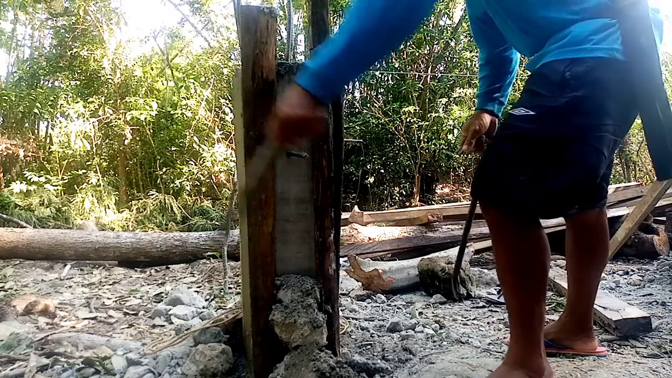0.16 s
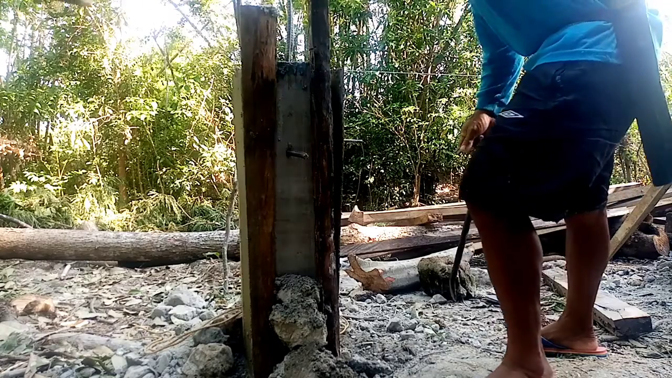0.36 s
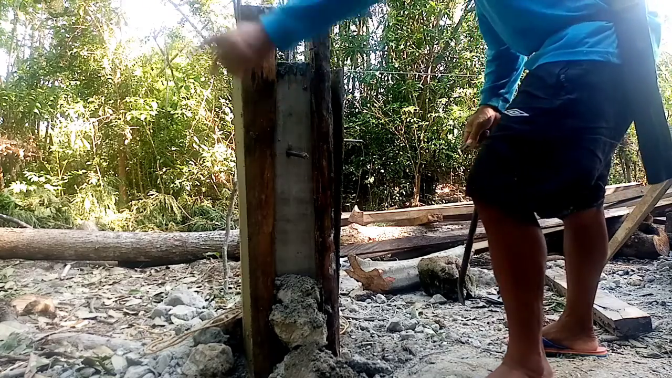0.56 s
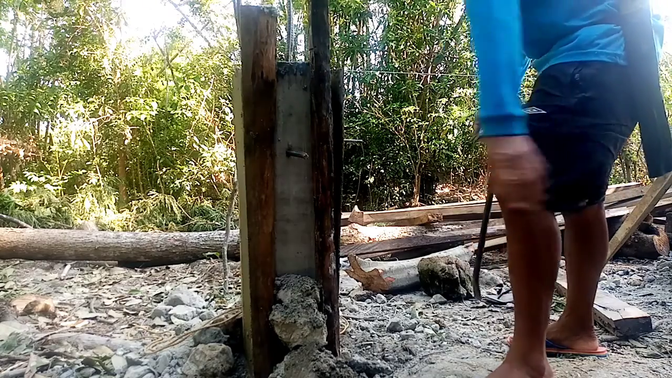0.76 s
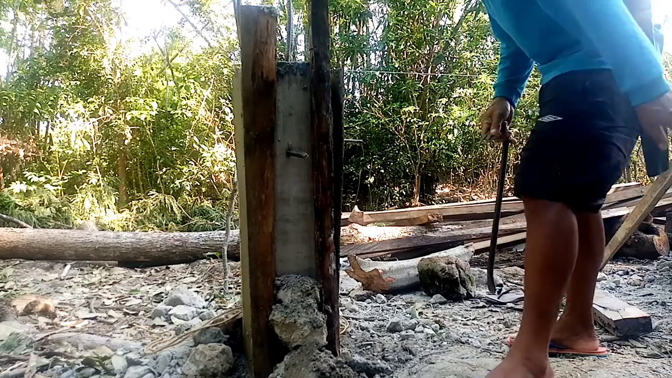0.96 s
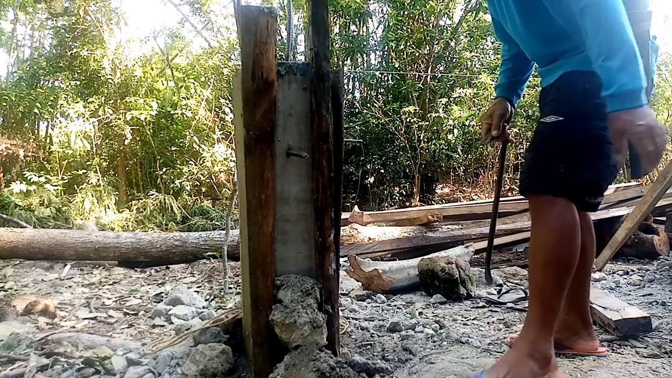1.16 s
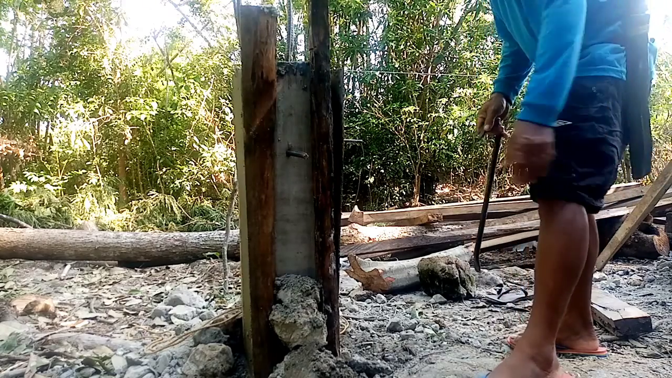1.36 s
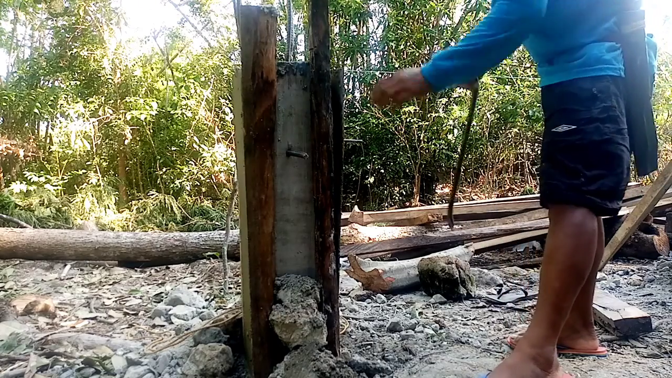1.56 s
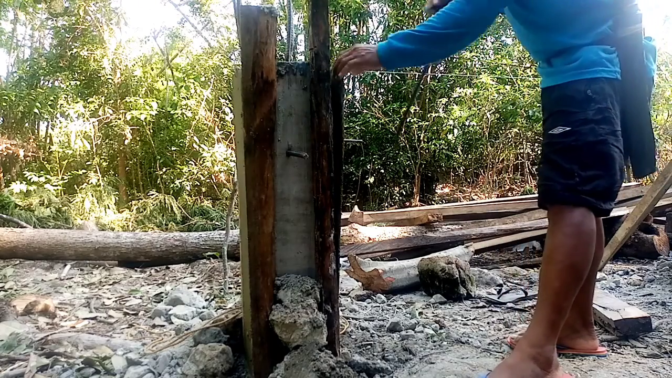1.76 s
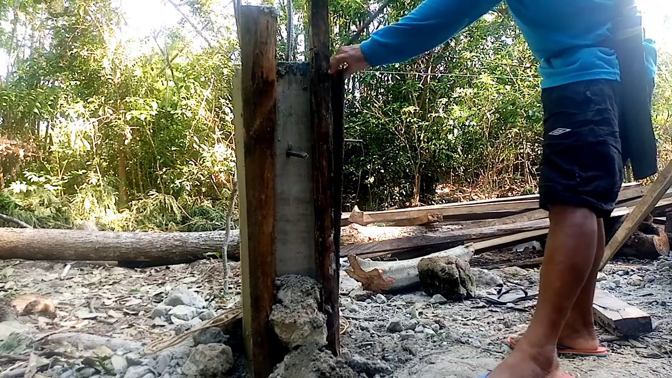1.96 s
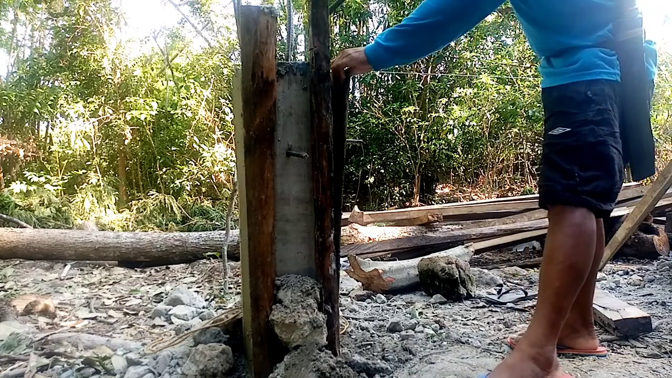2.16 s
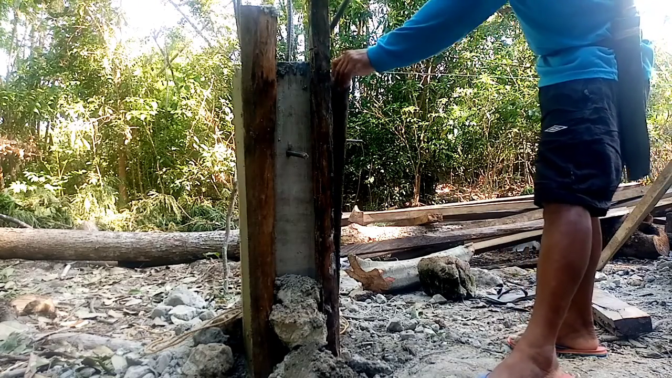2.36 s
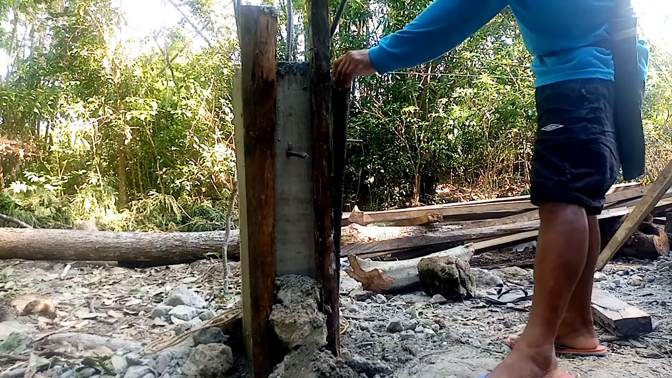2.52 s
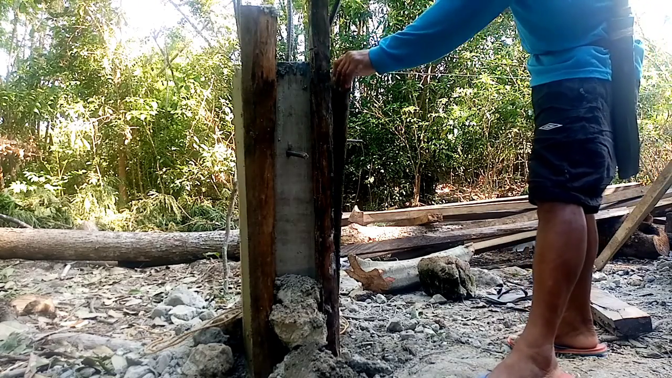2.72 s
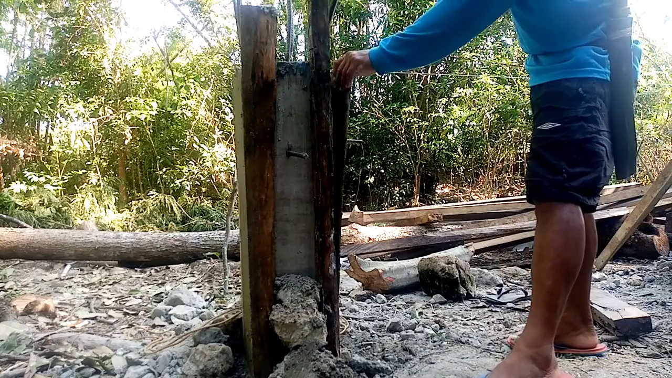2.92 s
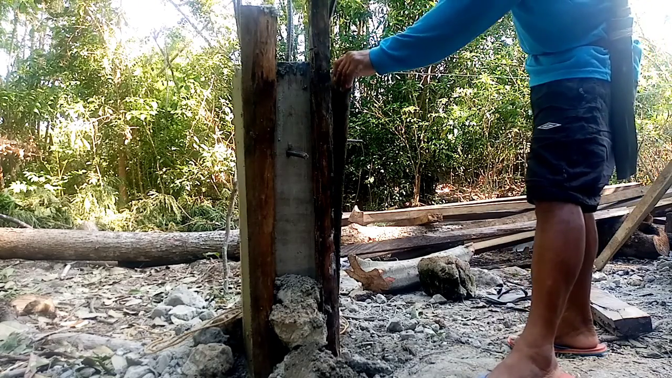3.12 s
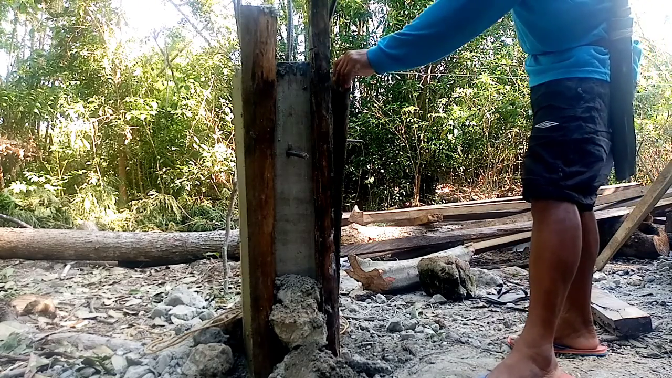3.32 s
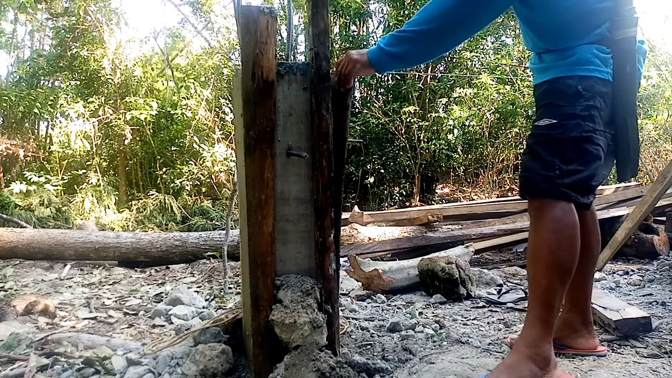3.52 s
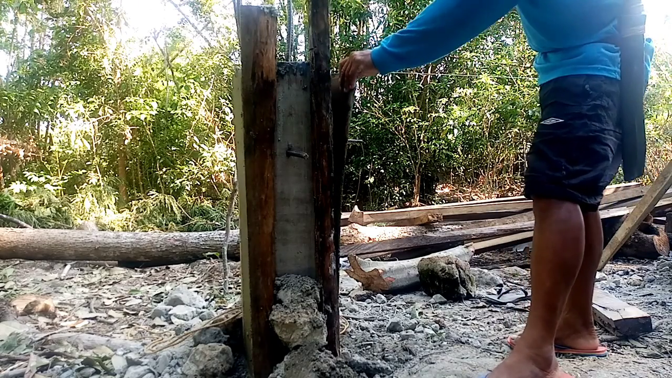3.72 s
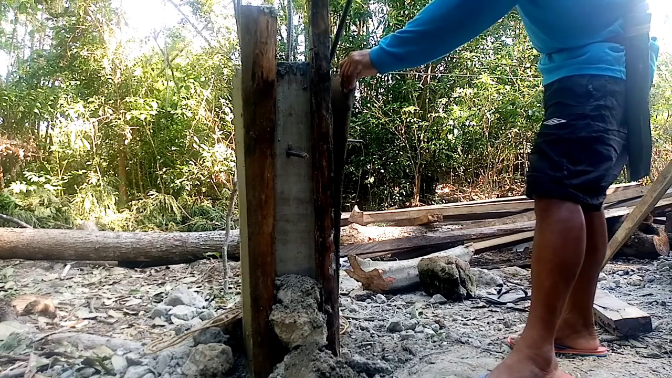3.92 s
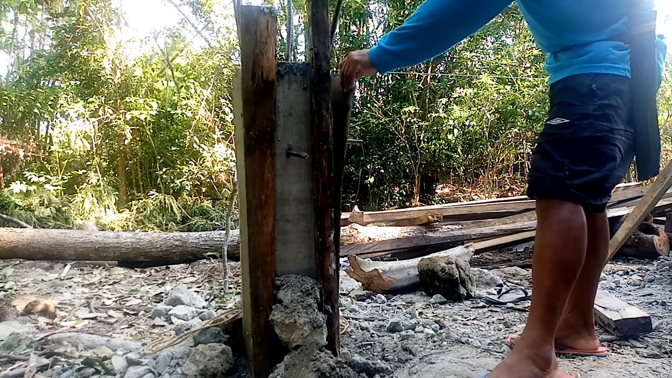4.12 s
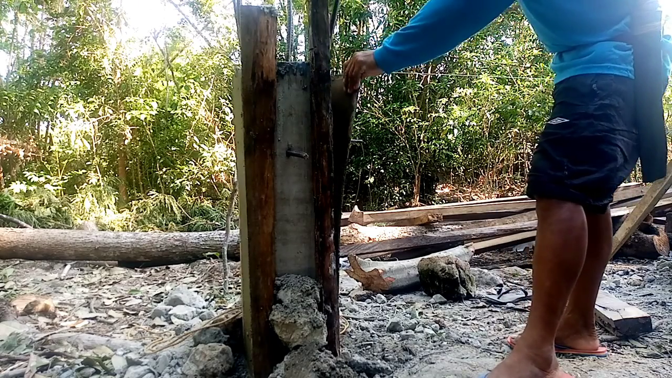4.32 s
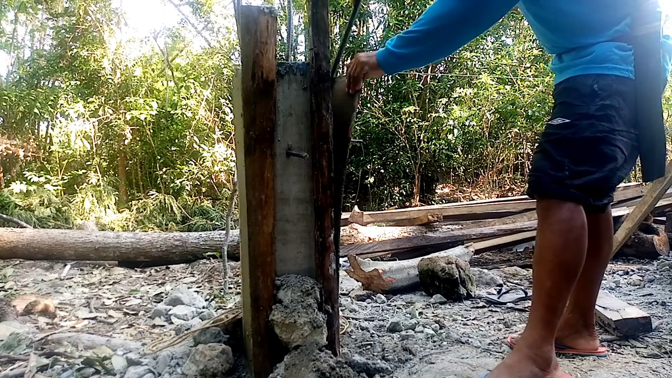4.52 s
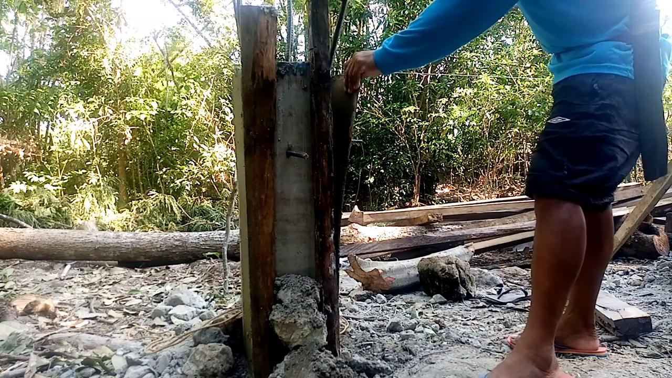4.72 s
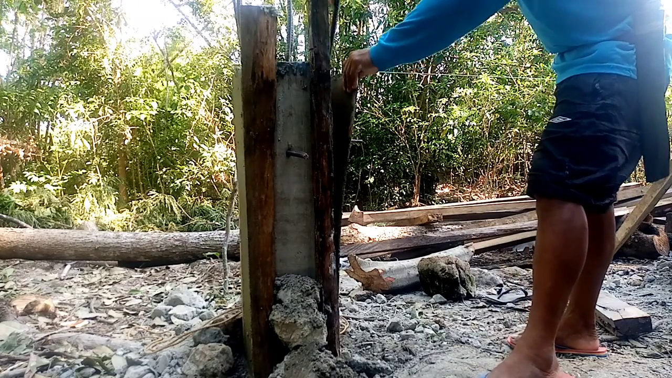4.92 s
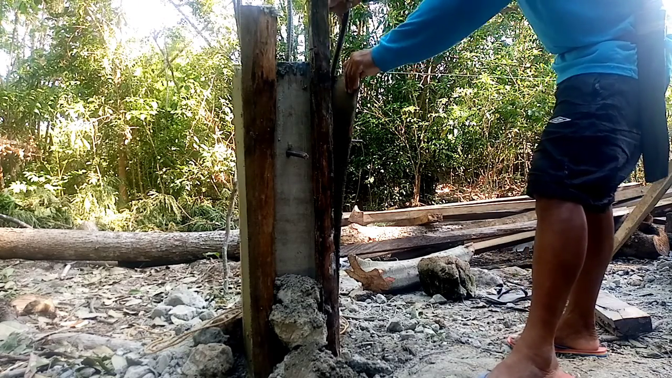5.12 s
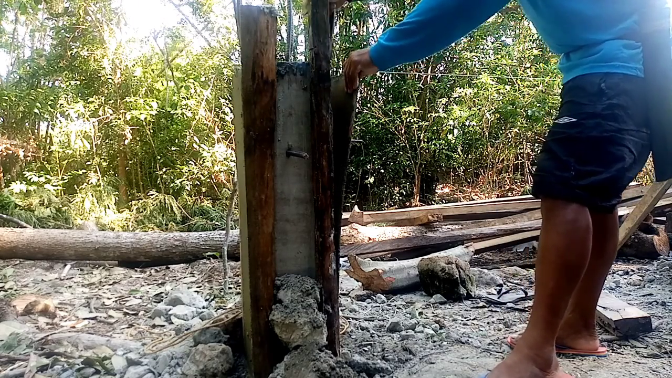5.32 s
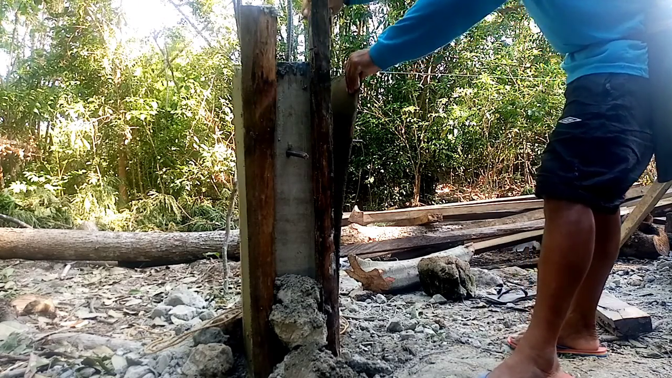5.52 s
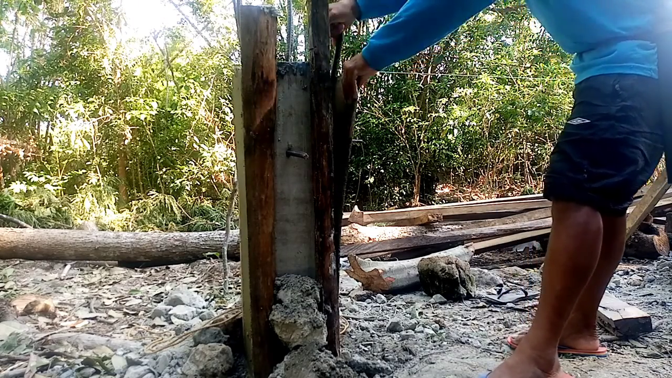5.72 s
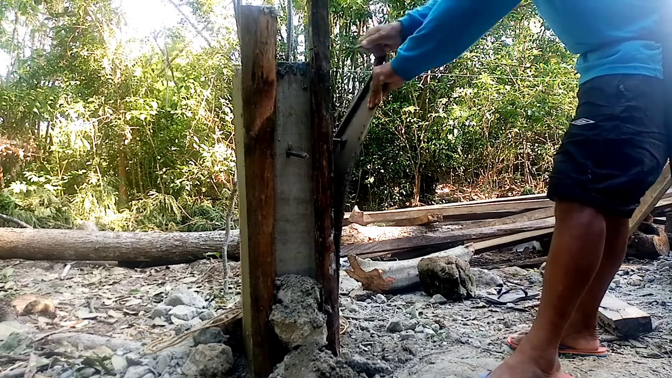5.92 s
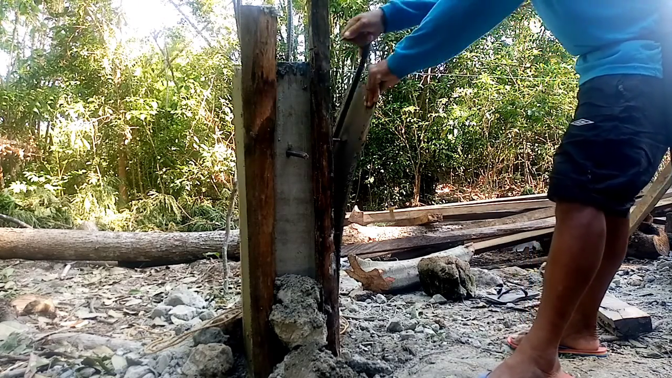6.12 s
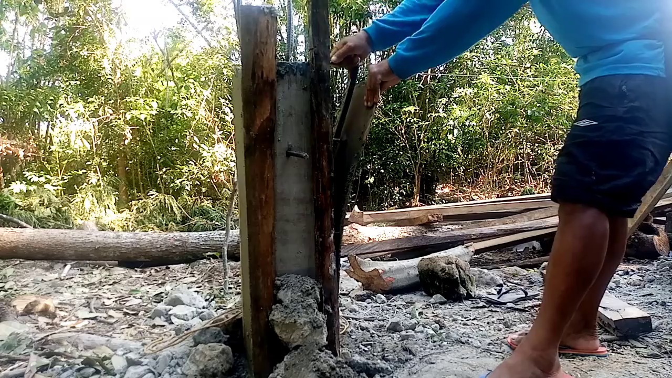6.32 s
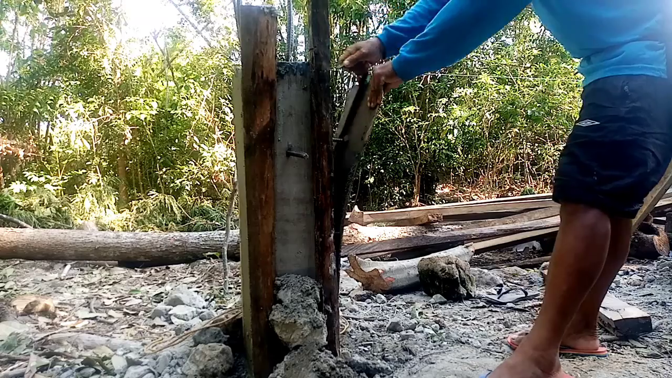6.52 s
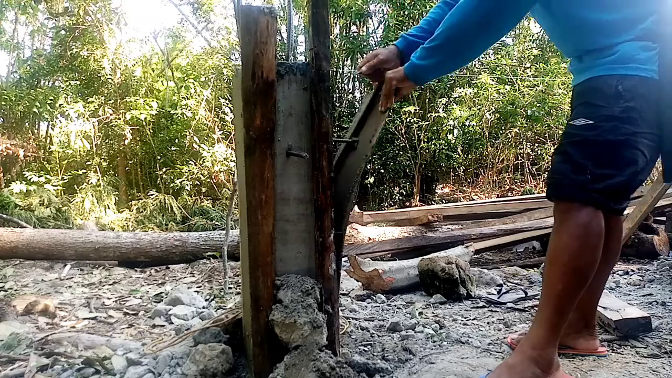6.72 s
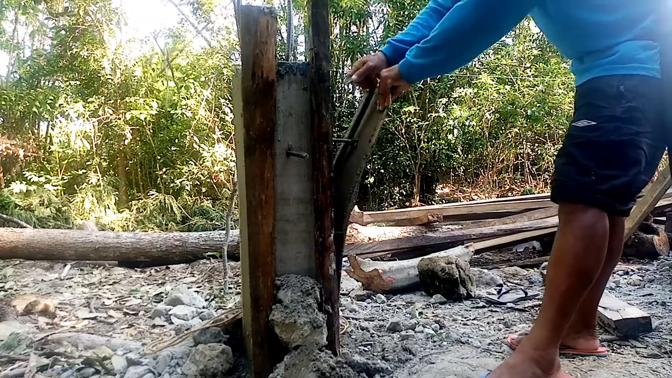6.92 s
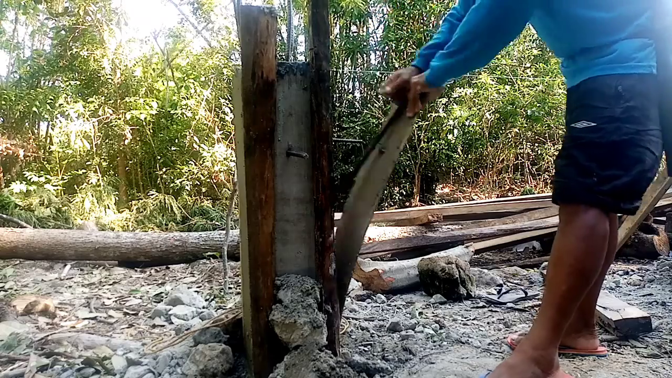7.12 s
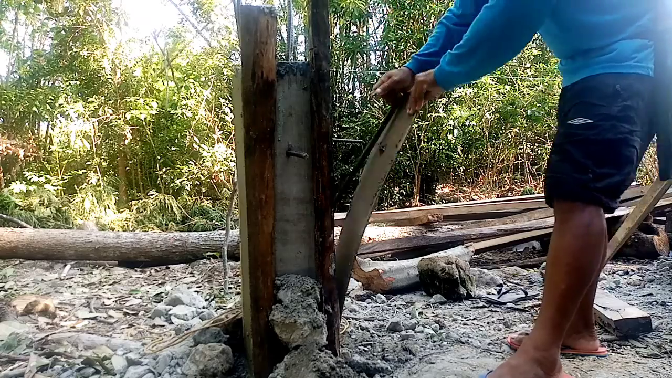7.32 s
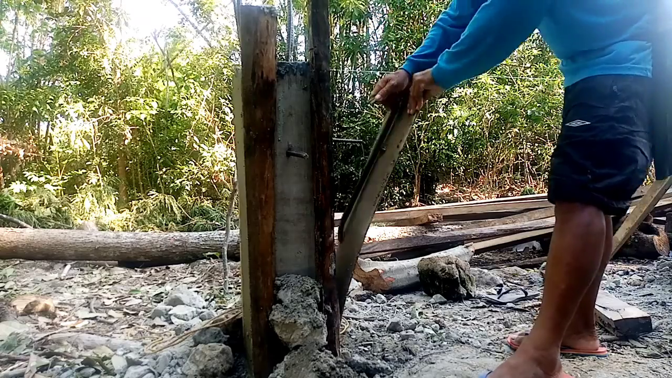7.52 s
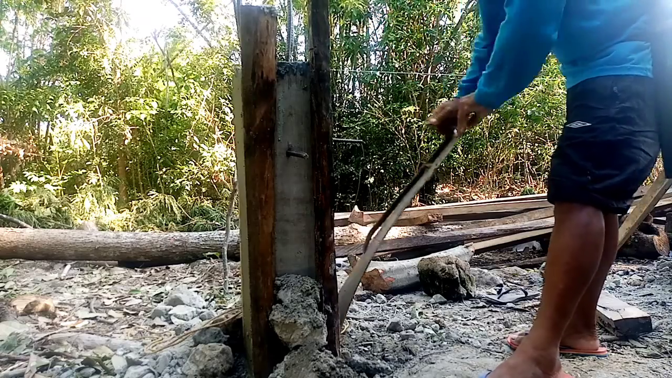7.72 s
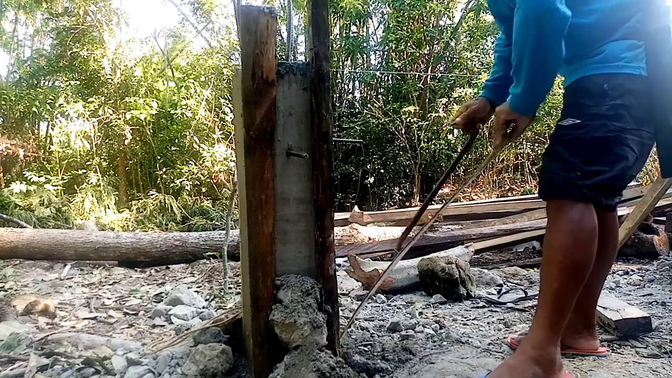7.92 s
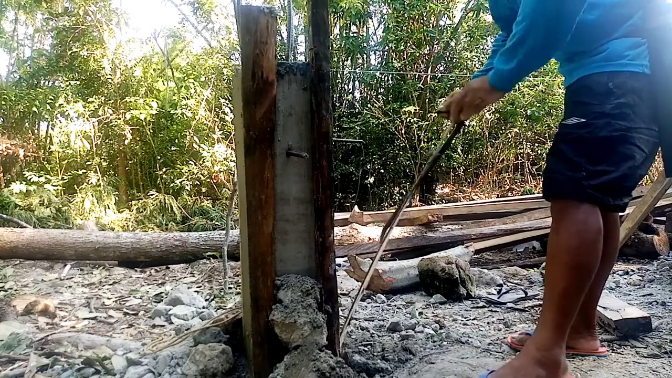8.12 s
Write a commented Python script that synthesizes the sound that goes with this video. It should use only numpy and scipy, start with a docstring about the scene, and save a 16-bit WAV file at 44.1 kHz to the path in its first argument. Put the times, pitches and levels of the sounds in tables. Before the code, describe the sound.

Throughout, a dense shrill insect chorus at about 6 to 9 kHz wavers lightly, louder on the right, over a very faint rumble of open air. Faint bird whistles come near 0.1 and 1.5 seconds, then short falling ones from 3.9 to 5.7. At 0.8 a stick lands flat on gravel with a sharp woody clatter and shifting stones, hopping weakly at 1.1. Quiet follows, with faint bumps and ticks from 1.9 to 3. At 3.5 a crack and hollow knocks begin the prying; another knock comes at 4.15, and the loudest, hardest crack at 4.67 with knocks just after. Soft scrapes fill 4.9 to 5.6. From 5.7 mortar chips spit and wooden knocks multiply, with a sharp snap at 6.5, a dense clatter from 6.9 to 7.2, and strong lower-pitched knocks at 7.45 and 7.7, ending in light scraping. Close, stereo, with slight tree reverberation.

```python
"""A building site beside a bamboo thicket, where insects shrill over faint air and a far bird whistles.
A tossed stick lands on gravel and bounces: wood modes and noise bursts, with grains for shifting stones.
Then a crowbar works a formwork board off a concrete post: the board scrapes, cracks and knocks, chips of
mortar break off, and its note sinks overall as it comes free. Contacts reach the two microphone ports a
moment apart; the trees answer diffusely."""
import sys
import numpy as np
from scipy import signal
from scipy.fft import rfft, irfft
from scipy.io import wavfile
from scipy.ndimage import map_coordinates

SR = 44100
rng = np.random.default_rng(int(sys.argv[2]) if len(sys.argv) > 2 else 0)


def transcribe(signal):
    """Save signal, clipped to [-1, 1], as a 16-bit WAV file at the path in sys.argv[1]."""
    frames = np.atleast_2d(signal).T
    limited = np.clip(frames, -1, 1)
    pcm = np.round(limited * 32767).astype(np.int16)
    wavfile.write(sys.argv[1], SR, pcm)


N = 360297  # length in samples

# Open air, its rumble: pitch_hz, density_db (dB per Hz, relative)
AIR_SPECTRUM = [(20, 5), (50, -5.5), (110, -0.5), (150, 0), (230, -14), (400, -20), (1200, -21.5),
                (4500, -24.5), (9000, -23)]
# Insect chorus as each port hears it: pitch_hz, density_db (dB per Hz, relative)
CHORUS_LEFT = [(4700, -60.5), (5300, -30.5), (5700, -13), (6130, -4.5), (6500, 0), (7250, -3.5), (7700, -8),
               (8300, -4), (9300, -9.5), (10200, -15.5), (11000, -15), (12500, -54)]
CHORUS_RIGHT = [(4700, -55.5), (5300, -28), (5700, -23), (6130, -4), (6700, -6.5), (7250, -2.5), (7700, -2),
                (8250, -2), (8800, -10.5), (10000, -19.5), (12000, -33), (15500, -38)]
# Nearer insects: pitch_hz, level_db (before wavering and placing)
NEAR_SINGERS = [(6150, -62), (6655, -59), (6875, -69), (7040, -61.5), (7225, -54.5), (7450, -58),
                (7890, -67.5), (8215, -61.5)]
# Whistles of a far bird: start_s, end_s, first_hz, last_hz (before wavering), level_db (before flutter)
WHISTLES = [(.14, 0.267, 2030, 1670, -82), (1.503, 1.627, 2770, 2700, -82), (3.91, 4.03, 1727, 1723, -76),
            (4.19, 4.33, 1910, 1830, -80), (4.42, 4.75, 1823, 1715, -75.5), (5.0, 5.29, 1860, 1816, -71.5),
            (5.24, 5.687, 1770, 1656, -73)]
# Answer of the thicket: pitch_hz, t60_s
TREE_DECAY = [(100, 0.36), (800, 0.4), (3000, 0.57), (8000, 0.81), (15000, 0.59)]

# Stick meeting the ground, flat at first, then in a hop: start_s, strength_db
STICK_HITS = [(0.816, -43.5), (0.821, -43), (.829, -40.5), (.843, -43), (0.8488, -42), (.86, -43),
              (1.076, -48), (1.086, -48), (1.164, -51), (1.234, -60)]
# Stones shifting under the stick: start_s, end_s, strength_db
GRAVEL_SLIDES = [(0.807, 0.871, -38.5), (.84, 0.935, -47.5), (.9, 1.031, -63.5), (1.058, 1.22, -56),
                 (1.183, 1.324, -71)]
# Low modes of the stick lying on the ground: pitch_hz, level_db, t60_s (before small random changes)
GROUND_MODES = [(166, -2.5, .04), (230, -0.5, .045), (350, -2, 0.11), (478, -4.5, 0.027)]

# Board knocking against the post: start_s, strength_db, hardness_db (below 0 a dull bump, above 15 a crack)
KNOCKS = [(2.006, -72, -28), (2.427, -59.5, -9), (2.926, -57, -18), (2.985, -56, 13), (3.455, -59, 16),
          (3.5113, -47.5, 35), (3.5438, -38.5, -2), (3.579, -35.5, 2), (4.023, -55.5, 20),
          (4.162, -40, -1.5), (4.327, -57.5, -32), (4.6676, -27, 22), (4.704, -39.5, -3),
          (4.786, -37.5, -9), (4.7951, -32.5, 5), (5.719, -53, 12.5), (5.841, -44.5, -13), (5.87, -43, -3),
          (6.019, -37, -5.5), (6.082, -43, -9), (6.357, -51.5, -14.5), (6.564, -41.5, -1),
          (6.618, -39.5, 26.5), (6.818, -47, -7), (6.901, -42, 10), (6.909, -35, -2), (6.926, -39, -7),
          (7.0054, -30.5, -0.5), (7.026, -38.5, 11.5), (7.069, -39, 2), (7.115, -33, 12.5),
          (7.215, -37.5, 8), (7.447, -34.5, 3), (7.562, -41, 0), (7.708, -28.5, 1), (7.7115, -40, 12.5),
          (7.738, -42, 0), (7.834, -41.5, 2)]
# Board dragging over concrete: start_s, end_s, strength_db, hardness_db
SCRAPES = [(3.5, 3.625, -54, -4.5), (3.735, 3.887, -50, -2.5), (4.301, 4.471, -53, -4.5),
           (4.898, 5.047, -55, -1), (5.186, 5.353, -62, 5), (5.452, 5.628, -60.5, 0),
           (5.719, 5.911, -46, 2), (5.882, 5.996, -56.5, 5), (6.077, 6.283, -59.5, -5.5),
           (6.437, 6.617, -50, 5), (6.615, 6.835, -52.5, 12.5), (6.886, 7.07, -52.5, -0.5),
           (7.489, 7.677, -58, 3.5), (7.637, 7.815, -47, -2), (7.748, 7.959, -59.5, -3)]
# Chips of mortar breaking off: start_s, strength_db
CHIPS = [(1.931, -52), (3.455, -53), (3.5112, -39.5), (4.137, -41.5), (4.693, -52.5), (5.287, -45.5),
         (5.759, -40), (5.798, -39), (5.818, -40.5), (5.96, -50), (6.022, -45.5), (6.489, -46),
         (6.4974, -33), (6.532, -38.5), (6.6665, -38), (6.763, -45), (6.901, -36.5), (6.926, -37),
         (6.996, -37.5), (7.114, -32), (7.714, -34)]
# As the board comes free its note sinks overall and it shakes the form less: start_s, note_hz, thud_db
STRAIN = [(3.55, 724, 2), (3.75, 873, -2), (5.3, 849, -0.5), (6.051, 740, 2), (6.5, 585, -3.5),
          (7.4, 658, -2.5), (7.7, 577, -13.5)]
# Low modes of the whole form: pitch_hz, level_db, t60_s (before small random changes)
FORM_MODES = [(105, -6, 0.11), (143, -3.5, 0.11), (210.6, 1, 0.091), (245, -0.5, 0.08), (342, -8, 0.13)]
# Modes of the board or stick: pitch (multiple of the note), level_db, t60_s (before small random changes)
BOARD_MODES = [(.52, -16.5, 0.059), (.7, -10.5, 0.075), (.88, 1.5, 0.022), (1.04, 4, 0.026),
               (1.36, -7.5, 0.041), (1.7, -16.5, 0.024)]
# High timber modes, in every crack and rub: pitch_hz, level_db, t60_s (before small random changes)
TIMBER_MODES = [(1133, 3.5, .04), (1280, -2.5, 0.025), (1987, -6, 0.019), (2120, -0.5, 0.034),
                (2300, -10, 0.029), (2810, -0.5, 0.083), (3126, 1, 0.085), (3800, -5.5, 0.24),
                (5070, -1.5, 0.11), (5050, -2.5, .02)]

# Colours of the four parts of a contact: pitch_hz, level_db
THUD_COLOUR = [(25, -21.5), (70, -18), (130, -3), (215, 3), (330, -3.5), (600, -14), (1500, -69)]
KNOCK_COLOUR = [(150, -37), (400, -1), (600, 4), (830, -0.5), (1150, -12.5), (1600, -10.5), (3500, -41.5)]
CRACK_COLOUR = [(400, -39), (1000, -6.5), (1450, 1), (2050, -2), (2600, -0.5), (3050, -4), (3600, -3.5),
                (4300, -6), (6300, -2.5), (9000, -13), (12000, -30.5), (16000, -38)]
GRIT_COLOUR = [(1500, -2.5), (2600, -17), (3700, -1.5), (5200, 0), (7500, 4), (10000, 3), (12500, -2),
               (16000, 0.5)]
# Make-up of each kind of contact, rows thud, knock, crack, grit:
# level_db (over its strength), slope_db (dB more per dB of hardness)
STICK_MIX = [(2, 0.041), (1, 0), (9, 1.4), (4, 1.6)]
GRAVEL_MIX = [(6, 0), (-1, 0), (8, 0.13), (-8, 0)]
KNOCK_MIX = [(-3.5, -.5), (0.5, 0), (-9.5, .5), (-15.5, -0.01)]
SCRAPE_MIX = [(-4, 0), (1.5, -0.2), (-1.5, .2), (3, 0.8)]
CHIP_MIX = [(-19.5, 0), (-9.5, 0), (-15.5, 0), (1, 0)]

# Response of each microphone port: pitch_hz, level_db
LEFT_PORT = [(20, -24), (45, -8.5), (80, 0), (200, -1.5), (700, 0), (9800, 0.5), (11200, -10.5),
             (12500, -19), (15500, -8.5)]
RIGHT_PORT = [(20, -24.5), (45, -7.5), (80, 1.5), (200, 1.5), (700, 2), (7000, 3), (10500, 1.5),
              (13700, 0.5), (14500, 10), (15400, 11)]

HIT_SPAN_S = 0.02  # each part of a blow is levelled as rms over this time
BAND_LIMIT_HZ = 15650
STICK_NOTE_HZ, STICK_FIRM_DB = 740, -43  # contacts stronger than this are hard, weaker ones dull
NOTE_SPREAD = 0.04  # share by which the board's note varies with the point of contact
# Small knocks within a scrape: level over it, dB more per dB of its hardness, scatter
JUDDER_DB, JUDDER_BITE, JUDDER_SPREAD_DB = -3, 0.27, 3


def amp(db):
    """Decibels to gain."""
    return 10 ** (np.asarray(db) / 20)


def unit(x):
    """Scaled to rms 1."""
    return x / np.sqrt(np.mean(x ** 2) + 1e-20)


def along(points, hz):
    """(Hz, value) points read on a log frequency axis."""
    f, v = np.transpose(points)
    return np.interp(np.log(hz + 1), np.log(f + 1), v)


def wobble(rate):
    """A smooth random curve, rate knots a second."""
    knots = rng.standard_normal(int(N * rate / SR) + 4)
    return map_coordinates(knots, [np.arange(N) * rate / SR])


def colour(points, size=2048):
    """The causal impulse response of a spectrum, by folding its cepstrum (minimum phase)."""
    cepstrum = irfft(np.log(amp(along(points, np.fft.rfftfreq(size, 1 / SR)))))
    cepstrum[1:size // 2] *= 2
    cepstrum[size // 2 + 1:] = 0
    return irfft(np.exp(rfft(cepstrum)))


def through(x, response):
    """x convolved with a response, at its own length."""
    return signal.fftconvolve(x, response)[:len(x)]


def add(track, s, sound):
    """Mix a sound into the track at time s, cut at the end."""
    part = track[..., round(s * SR):][..., :sound.shape[-1]]
    part += sound[..., :part.shape[-1]]


def fade(t60, count=SR // 5):
    """An exponential decay, 60 dB in t60 seconds."""
    return np.exp(-np.log(1000) * np.arange(count) / SR / t60)


def burst(t60):
    """Dying noise."""
    decay = fade(t60)
    return unit(rng.standard_normal(len(decay)) * decay)


def among_trees(ports, trees_db):
    """The thicket gives back a diffuse answer, a noise tail whose decay time depends on frequency."""
    hz, when, z = signal.stft(rng.standard_normal((2, SR)), SR, nperseg=256)
    decay = np.exp(-np.log(1000) * when / along(TREE_DECAY, hz)[:, None])
    tails = signal.istft(z * decay, SR, nperseg=256)[1][:, :SR]
    tails = tails * (1 - fade(0.043, count=SR))  # the answer swells in
    answer = [through(x, tail / np.linalg.norm(tail)) for x, tail in zip(ports, tails)]
    return ports + amp(trees_db) * np.array(answer)


def air():
    """A faint rumble of open air, coloured noise partly shared by both ports."""
    shared, left, right = [unit(through(rng.standard_normal(N), colour(AIR_SPECTRUM, size=8192)))
                           for _ in range(3)]
    drift = amp(1.2 * wobble(4))
    return amp(-70.5) * drift * (0.6 * shared + 0.95 * np.array([left, right]))


def shimmer():
    """Slow and quick small random changes of the chorus level."""
    return amp(0.4 * wobble(5) + 0.6 * wobble(60))


def insects():
    """Many far insects merge into a shrill noise, louder to the right; a few nearer ones hold their pitch."""
    chorus = []
    for spectrum, db in ((CHORUS_LEFT, -47.5), (CHORUS_RIGHT, -42.3)):
        shrill = unit(through(rng.standard_normal(N), colour(spectrum)))
        chorus.append(amp(db) * shimmer() * shrill)
    chorus = np.array(chorus)
    t = np.arange(N) / SR
    for hz, db in NEAR_SINGERS:
        phase = 2 * np.pi * hz * t
        song = amp(db) * (wobble(45) * np.sin(phase) + wobble(45) * np.cos(phase))
        # weaker and shifted in time at the left port
        chorus += [amp(-3.5) * np.roll(song, rng.integers(SR)), amp(3.5) * song]
    return chorus


def bird():
    """Thin, falling, slightly wavering sine whistles from far off, deep in the trees' answer."""
    track, waver = np.zeros(N), 1 + 0.007 * wobble(40)
    for start, end, first_hz, last_hz, db in WHISTLES:
        u = np.linspace(0, 1, max(round((end - start) * SR), 2))
        pitch = (first_hz + (last_hz - first_hz) * u) * waver[round(start * SR):][:len(u)]
        tone = np.sin(2 * np.pi * np.cumsum(pitch) / SR)
        add(track, start, amp(db) * np.sqrt(2) * np.sin(np.pi * u) * tone)
    flutter = amp(2.5 * wobble(25) - 1)
    return among_trees(flutter * np.array([track, track]), trees_db=1.5)


def to_ports(x, lag, scatter_db, scatter_t60):
    """A sound reaches the left port lag s early; the stony ground scatters its treble differently to each."""
    ports = []
    stones = colour([(200, -17), (700, -8.5), (1800, -0.5), (16000, 0)], size=256)
    for delay in (0, round(lag * SR)):
        scatter = through(burst(scatter_t60), stones)
        path = amp(scatter_db) * scatter / np.linalg.norm(scatter)
        path[0] += 1  # the direct sound
        ports.append(through(x, np.pad(path, (delay, 0))))
    return np.array(ports)


def ring(modes, scale=1, detune=0.025, vary_db=2.0):
    """Damped modes of alternating sign, struck a little differently each time."""
    t = np.arange(SR // 5) / SR
    total = 0
    for k, (f, db, t60) in enumerate(modes):
        level = (-1) ** k * amp(db + vary_db * rng.normal())
        hz = scale * f * (1 + detune * rng.normal())
        total = total + level * fade(t60) * np.sin(2 * np.pi * hz * t)
    return unit(total)


def wood(low_modes, note_hz, ringing):
    """Responses of a contact's parts: the low thud, the wood's knock, the fibres' crack, the spit of grit."""
    thud, knock, crack, grit = [unit(np.pad(colour(c), (0, SR // 5 - 2048)))
                                for c in (THUD_COLOUR, KNOCK_COLOUR, CRACK_COLOUR, GRIT_COLOUR)]
    return (unit(ring(low_modes) + 0.66 * unit(through(burst(0.065), thud))),
            unit(ring(BOARD_MODES, note_hz) + 0.87 * unit(through(burst(0.0027), knock))),
            unit(crack + ringing * ring(TIMBER_MODES, detune=0.0068, vary_db=2.5)),
            grit)


def mix(shares, strength_db, hardness_db):
    """Levels of thud, knock, crack and grit, each part following hardness by its own slope."""
    return [strength_db + db + slope * hardness_db for db, slope in shares]


def contacts(table, low_modes, chatter, chatter_t60, crack_t60, loose, loose_t60, grit_t60, soft_rise,
             **place):
    """Blows ring the wood and leave it chattering; weak cracks start more gradually, over up to soft_rise s."""
    track, t = np.zeros((2, N)), np.arange(SR // 5) / SR
    for s, thud_db, knock_db, crack_db, grit_db, note_hz in table:
        thud, knock, crack, grit = wood(low_modes, note_hz, ringing=0.35)
        soft = np.clip((-34.0 - crack_db) / 22, 0, 1)  # 0 snaps, 1 starts softly
        onset = 1 - fade(0.00087 + soft_rise * soft)
        click = 1.5 * (1 - soft) * unit(t == 0)  # the first fibre lets go at once
        tearing = 1.1 * unit(onset * burst(crack_t60 + soft_rise * soft))
        snap = click + tearing + loose * unit(onset * burst(loose_t60))
        rattle = unit(through(onset * burst(chatter_t60), colour(KNOCK_COLOUR)))
        spit = through(onset * burst(grit_t60 + soft_rise * soft), grit)
        parts = [(thud_db, thud),
                 (knock_db, knock + chatter * (1 + soft) * rattle),
                 (crack_db, through(snap, crack)),
                 (grit_db, spit)]
        blow = sum(amp(db) * unit(x) for db, x in parts) * np.sqrt(HIT_SPAN_S / t[-1])
        add(track, s, to_ports(blow, **place))
    return track


def grains(count, rate, spread_db):
    """Sparse clicks of very unequal size, on average rate a second."""
    size = amp(spread_db * np.minimum(rng.exponential(size=count), 4))
    return unit(rng.standard_normal(count) * size * (rng.random(count) < rate / SR))


def rubbing(table, low_modes, rate, spread_db, swell, catch_db, catch_rate, level_db, ringing, **place):
    """Tiny slips excite the same wood as the blows do, in clumps as the surface catches."""
    track = np.zeros((2, N))
    shared, *own = [wobble(catch_rate) for _ in range(5)]
    for start, end, *levels, note_hz in table:
        count = max(round((end - start) * SR), 64)
        envelope = np.abs(np.sin(np.linspace(0, np.pi, count))) ** swell
        slips = grains(count, rate, spread_db) * envelope
        stroke = 0
        for db, body, catch in zip(levels, wood(low_modes, note_hz, ringing), own):
            grip = (0.53 * shared + catch)[round(start * SR):][:count]
            clumps = unit(amp(catch_db * grip))
            rubbed = signal.fftconvolve(slips * clumps, body / np.linalg.norm(body))
            stroke = stroke + amp(db + level_db) * rubbed
        add(track, start, to_ports(stroke, **place))
    return track


def tossed_stick():
    """The stick crashes flat on the stones and hops; the stronger a contact, the harder it sounds."""
    place = dict(lag=0.00126, scatter_db=-1.5, scatter_t60=0.09)
    hits = [(s, *mix(STICK_MIX, db, db - STICK_FIRM_DB), STICK_NOTE_HZ * (1 + 0.2 * rng.normal()))
            for s, db in STICK_HITS]
    slides = [(start, end, *mix(GRAVEL_MIX, db, db - STICK_FIRM_DB), STICK_NOTE_HZ)
              for start, end, db in GRAVEL_SLIDES]
    blows = contacts(hits, GROUND_MODES, chatter=0.74, chatter_t60=0.049, crack_t60=0.043,
                     loose=0.34, loose_t60=0.049, grit_t60=0.011, soft_rise=0.027, **place)
    stones = rubbing(slides, GROUND_MODES, rate=4500, spread_db=2.5, swell=0.64, catch_db=3.5,
                     catch_rate=130, level_db=-4.0, ringing=0.05, **place)
    return among_trees(amp(-3.5) * blows + stones, trees_db=-15.5)


def judders(count):
    """The dragged board catches and lets go, mostly in mid-stroke, and more strongly where it bites hard."""
    knocks = []
    for start, end, db, hardness in SCRAPES:
        for _ in range(count):
            s = start + (end - start) * rng.beta(2, 2)
            strength = db + JUDDER_DB + JUDDER_BITE * hardness + JUDDER_SPREAD_DB * rng.normal()
            knocks.append((s, strength, hardness))
    return knocks


def board(s, shares, strength_db, hardness_db):
    """Levels of the four parts, and the note, of a contact of the board at time s."""
    when, notes, thuds = np.transpose(STRAIN)
    thud_db, *others = mix(shares, strength_db, hardness_db)
    note_hz = np.interp(s, when, notes) * (1 + NOTE_SPREAD * rng.normal())
    return (thud_db + np.interp(s, when, thuds), *others, note_hz)


def prying():
    """The board scrapes, judders and knocks against the post and breaks chips of mortar off it."""
    place = dict(lag=0.000962, scatter_db=-3.0, scatter_t60=0.048)
    knocks = [(s, *board(s, KNOCK_MIX, db, hardness)) for s, db, hardness in KNOCKS + judders(count=3)]
    chips = [(s, *board(s, CHIP_MIX, db, 0)) for s, db in CHIPS]
    strokes = [(start, end, *board(start, SCRAPE_MIX, db, hardness))
               for start, end, db, hardness in SCRAPES]
    blows = contacts(knocks, FORM_MODES, chatter=0.21, chatter_t60=0.086, crack_t60=0.0031,
                     loose=0.5, loose_t60=0.21, grit_t60=0.011, soft_rise=0.018, **place)
    ticks = contacts(chips, FORM_MODES, chatter=0.36, chatter_t60=0.079, crack_t60=0.0021,
                     loose=0.6, loose_t60=0.1, grit_t60=0.0057, soft_rise=0.001, **place)
    drag = rubbing(strokes, FORM_MODES, rate=2500, spread_db=3, swell=0.99, catch_db=2.5,
                   catch_rate=64, level_db=-3.0, ringing=0.23, **place)
    return among_trees(amp(-3.5) * blows + amp(-5) * ticks + drag, trees_db=-17.5)


def scene():
    """Everything at the two ports, from the background to the board."""
    return air() + insects() + bird() + tossed_stick() + prying()


def record(dry):
    """The left port is dull, the right one rings at the very top; a steep low-pass sets the band limit."""
    ports = np.array([through(x, colour(port)) for x, port in zip(dry, (LEFT_PORT, RIGHT_PORT))])
    low_pass = signal.ellip(10, 0.3, 80, BAND_LIMIT_HZ, fs=SR, output="sos")
    return signal.sosfilt(low_pass, ports)


dry = scene()
out = record(dry)
transcribe(out)
```